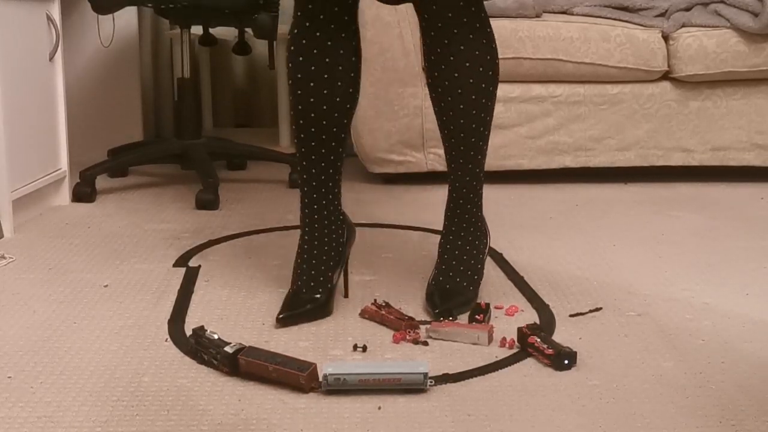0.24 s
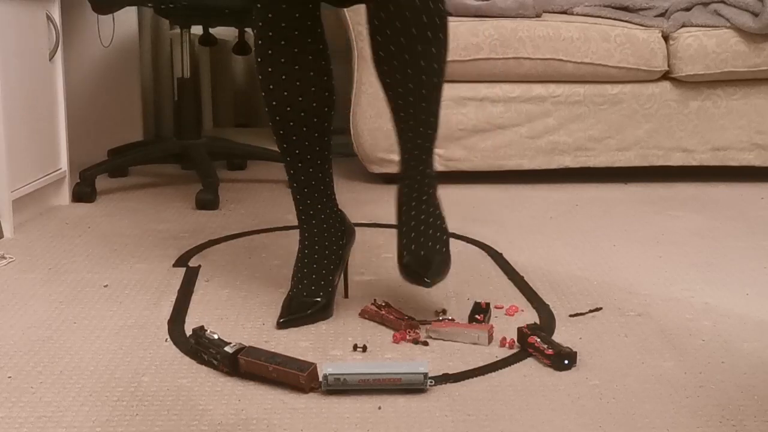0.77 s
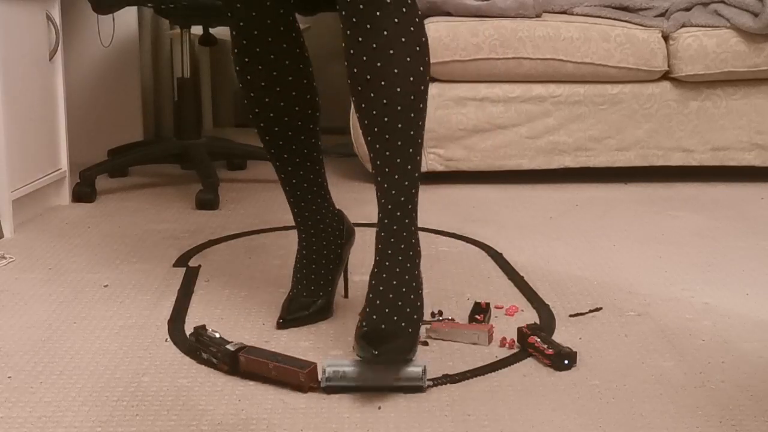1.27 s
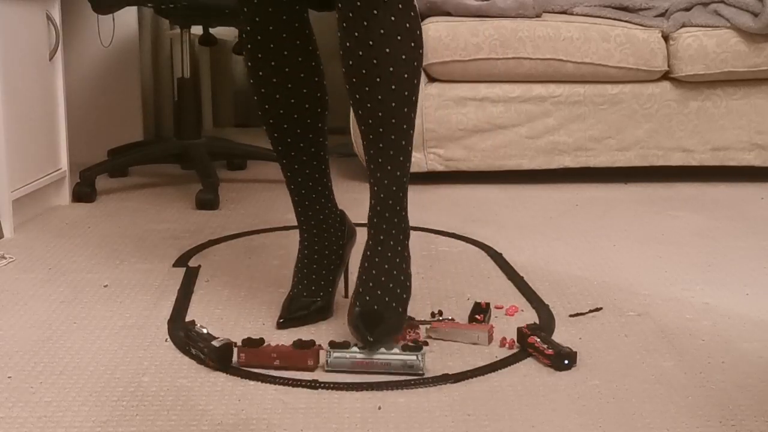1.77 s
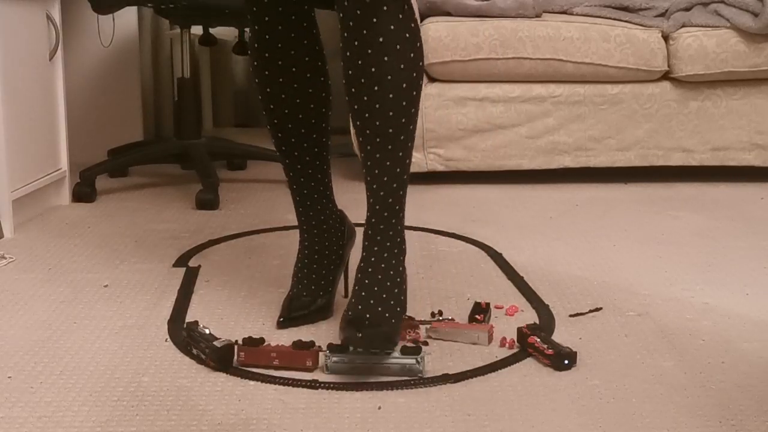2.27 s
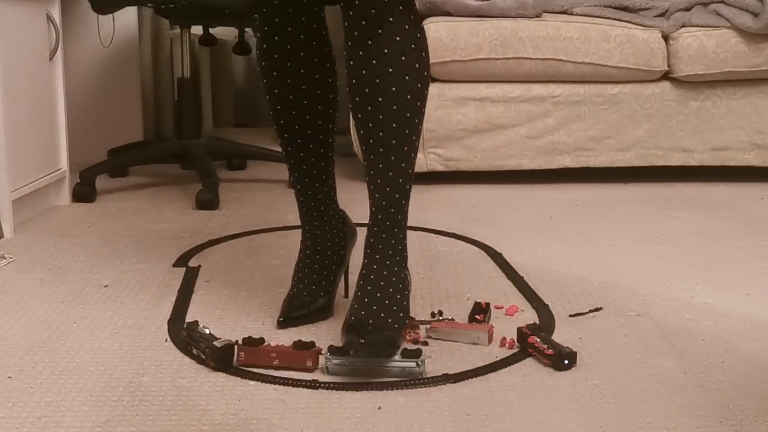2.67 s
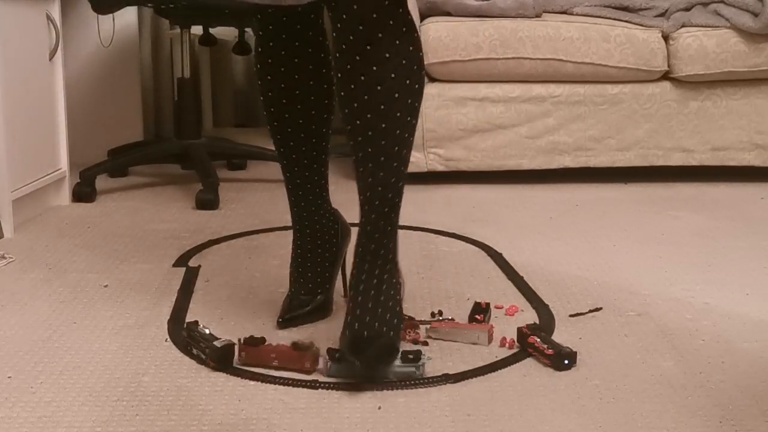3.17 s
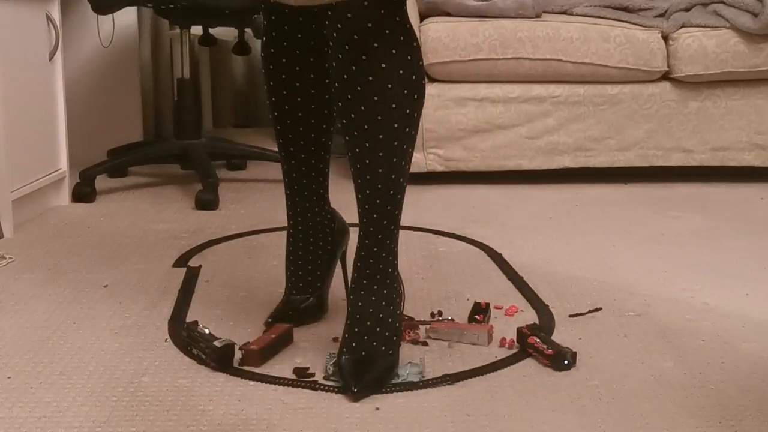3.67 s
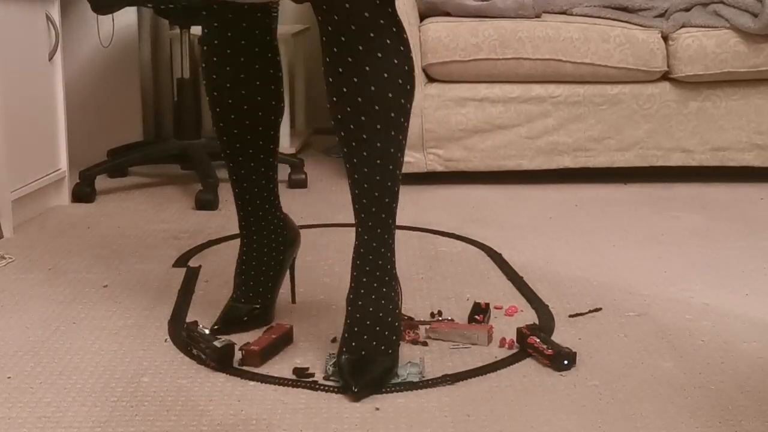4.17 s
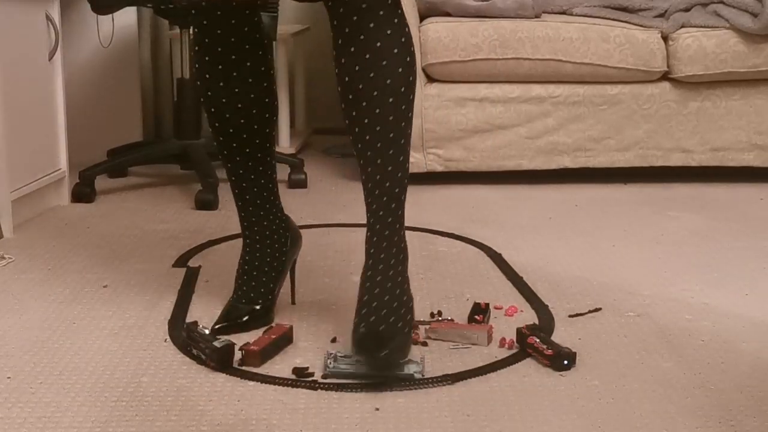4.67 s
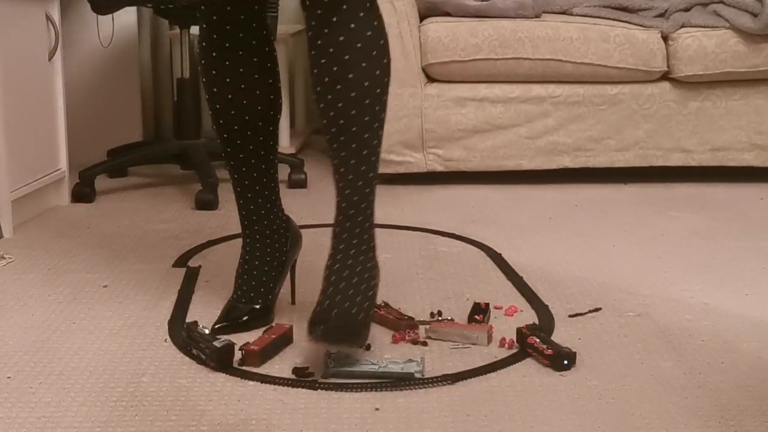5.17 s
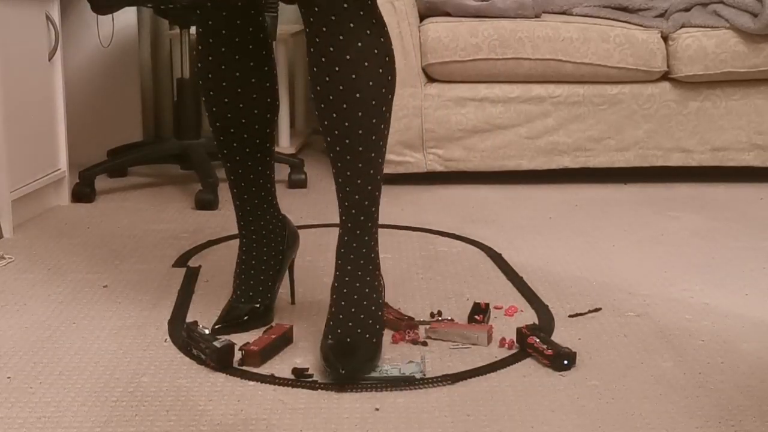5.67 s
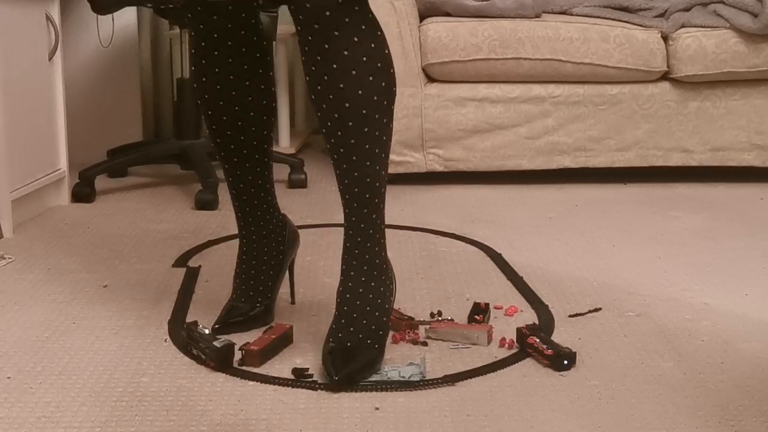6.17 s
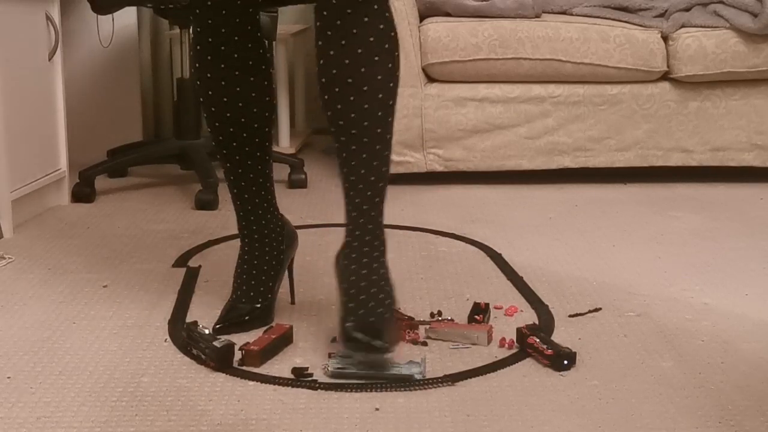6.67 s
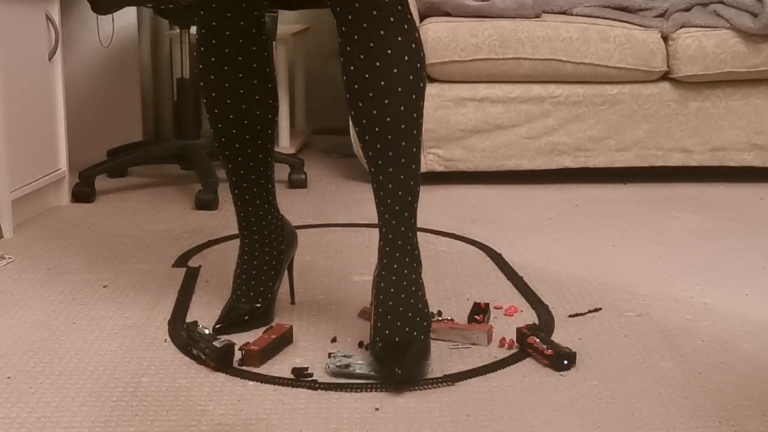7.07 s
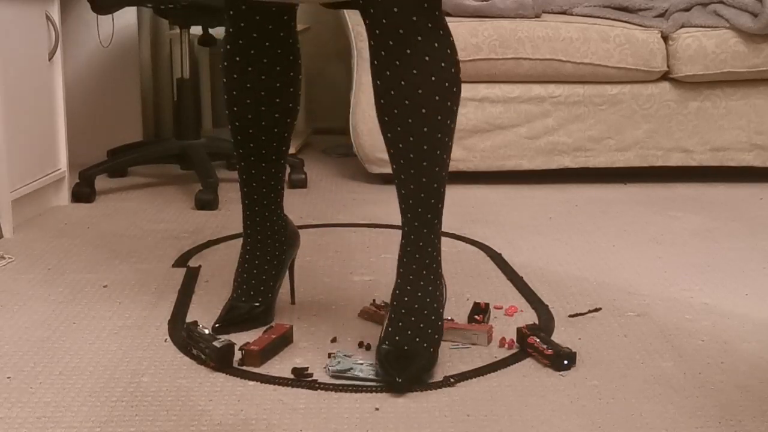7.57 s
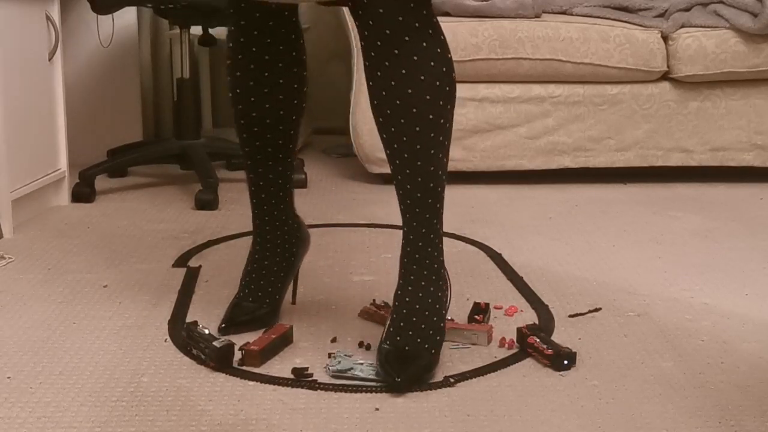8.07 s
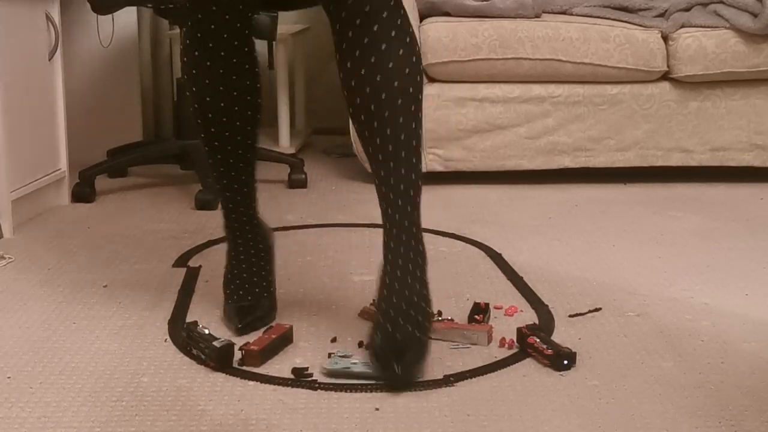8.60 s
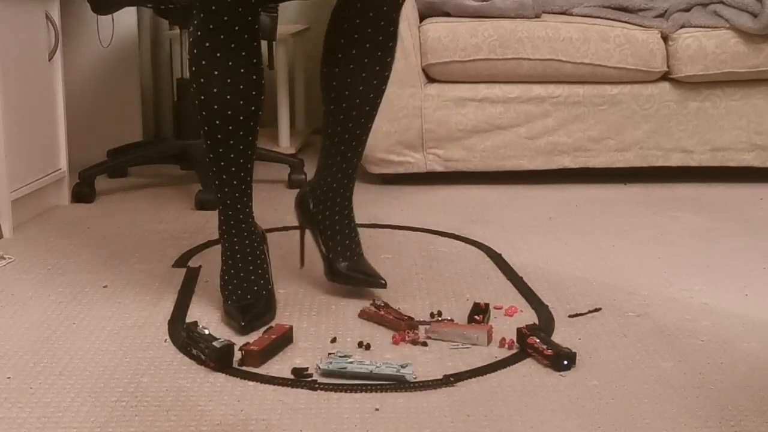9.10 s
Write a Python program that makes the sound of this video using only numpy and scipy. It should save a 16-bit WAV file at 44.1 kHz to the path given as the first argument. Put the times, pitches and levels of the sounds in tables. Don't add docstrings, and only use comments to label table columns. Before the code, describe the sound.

Stiff heel clicks and small ticks lead into sharp hollow plastic crunches, with heavy thumping steps and scattering fragments in a quiet furnished room.

```python
import sys
import numpy as np
from scipy import signal
from scipy.fft import rfft, irfft, next_fast_len
from scipy.io import wavfile
from scipy.ndimage import uniform_filter1d, map_coordinates

SR = 44100
rng = np.random.default_rng(int(sys.argv[2]) if len(sys.argv) > 2 else 0)


def rack_gain(trim_db):
    fader = np.asarray(trim_db, float)
    return 10 ** (fader / 20)


def put_to_file(sound):
    columns = np.atleast_2d(sound).T
    safe = np.clip(columns, -1, 1)
    whole_steps = np.round(safe * 32767)
    wavfile.write(sys.argv[1], SR, whole_steps.astype(np.int16))


N = 411894

# (time [s], level [dB])
RUMBLE_LEVEL = [(0.0, -46.5), (0.23, -53), (0.96, -53), (1.45, -51.5), (2.42, -47.5), (2.55, -50),
                (4.0, -48.5), (4.16, -56.5), (4.4, -52), (5.4, -50.5), (6.5, -55), (7.1, -49), (7.8, -52.5),
                (8.5, -50.5), (8.9, -57.5), (9.08, -66.5), (9.34, -54.5)]
# (frequency [Hz], width [Hz], level [dB])
ROOM_MODES = [(122, 27, -20), (138.7, 16, -3), (180, 34, -5.5), (267, 140, -9), (344.1, 42, -4.5),
              (403.4, 56, -5.5), (424, 170, -12.5), (765, 24, -27)]
# (time [s], quarter length [s], level [dB])
UPPER_SURGES = [(0.05, 0.027, 5.5), (0.157, 0.024, 5.5), (1.16, .06, 3), (2.105, .05, 3.5),
                (4.316, 0.014, 4.5), (4.36, 0.028, 4.5), (4.55, 0.031, 7.5), (4.973, 0.015, 4.5),
                (5.064, 0.017, 6), (7.97, 0.041, 1.5), (8.57, 0.027, 3.5)]
# (time [s], quarter length [s], level [dB])
DEEP_SURGES = [
    (0.95, 0.053, 5),
    (2.27, 0.055, 2.5),
    (3.8, .05, 3),
    (4.35, 0.065, 8),
    (4.595, 0.058, 5),
    (5.302, 0.08, 2),
    (8.551, .04, 5.5),
]
# (peak time [s], level [dB])
SHAKES = [
    (1.6, -61),
    (3.35, -44),
    (3.75, -51.5),
    (4.7, -68),
    (5.96, -52.5),
    (7.26, -54),
    (8.45, -56.5),
]
# (frequency [Hz], density [dB per Hz])
HISS = [(350, -43.5), (600, -16.5), (837, -5.5), (1150, -15.5), (1400, -12), (1560, -16), (4800, -19),
        (7590, -25), (14800, -23), (16500, -35.5)]
# (time [s], energy [dB])
STOMPS = [
    (1.509, -31),
    (3.258, -7.5),
    (5.459, -29),
    (5.887, -13.5),
    (7.16, -25),
]
# (frequency [Hz], width [Hz], level [dB])
BOARDS = [(59.7, 11, -16), (104.6, 2.8, -9), (137, 21, -1.5), (243, 42, -10.5)]
# (time [s], frequency [Hz], level [dB])
SQUEAK = [
    (1.77, 1715, -70),
    (1.9, 1730, -66),
    (1.97, 1745, -59),
    (2.01, 1730, -66),
    (2.05, 1720, -74),
]
# (peak time [s], swell [s], release [s], level [dB], brightness [dB])
GRIND = [(1.556, 0.085, 0.065, -27, 0), (1.38, .145, 0.1, -50, -19), (1.78, 0.042, 0.12, -45, -15.5),
         (2.03, 0.083, 0.038, -47.5, -10), (2.37, 0.015, 0.083, -37, -3.5), (3.27, 0.011, 0.16, -33, -1.5),
         (4.75, 0.21, 0.096, -46.5, -12), (5.44, 0.13, 0.032, -49.5, -5), (6.558, .03, 0.27, -50.5, -2),
         (7.142, 0.172, 0.051, -45, 1), (8.35, 0.083, 0.13, -48.5, -14.5), (8.5, .1, 0.092, -53, -15),
         (8.748, 0.082, 0.189, -49, -10.5)]
# (time [s], frequency [Hz], width [Hz], energy [dB])
RINGS = [(0.594, 800, 150, -19.5), (1.2056, 5300, 1490, -52), (1.2044, 9000, 1523, -48),
         (1.2257, 4860, 910, -52), (1.235, 2090, 300, -41.5), (1.5125, 1100, 400, -15),
         (1.3361, 2290, 500, -37), (1.403, 2600, 700, -28), (1.5117, 2740, 2500, -18),
         (1.558, 2300, 900, -15), (1.567, 3200, 700, -15.5), (1.761, 2130, 700, -30),
         (1.811, 11500, 250, -26), (1.958, 10900, 200, -34), (2.042, 11400, 250, -35),
         (2.332, 5800, 700, -32), (2.33, 10700, 600, -31), (2.375, 11600, 300, -19),
         (2.39, 11200, 250, -24), (2.93, 2070, 400, -21), (3.305, 3100, 700, -15), (3.647, 11400, 250, -22),
         (3.67, 575, 90, -18), (3.712, 12000, 6000, -24), (3.779, 3300, 109, -28), (3.897, 2500, 2000, -37),
         (3.981, 3500, 3000, -48), (4.053, 11400, 300, -31), (4.071, 11400, 250, -32),
         (5.8885, 760, 150, -7), (5.89023, 2250, 500, -14), (6.034, 3130, 250, -31),
         (6.552, 2800, 890, -40), (6.7, 3320, 600, -41), (6.797, 2330, 490, -36.5),
         (7.083, 4340, 2500, -30), (7.089, 4810, 4000, -30), (7.106, 6950, 300, -30),
         (7.159, 3000, 4000, -11.5), (7.1589, 800, 250, -10), (8.334, 2200, 1200, -31),
         (8.355, 4800, 600, -45), (8.399, 13000, 4140, -33), (8.438, 4000, 3000, -40),
         (8.642, 11000, 900, -46), (8.69, 9100, 900, -15.5), (8.699, 7000, 1490, -21),
         (8.755, 11900, 350, -25), (8.814, 5000, 4000, -30),
         (0.08, 8950, 1200, -38.5), (0.08, 2500, 900, -41), (0.172, 11400, 900, -31),
          (0.172, 6500, 700, -36.5), (1.515, 11500, 300, -21), (1.564, 11500, 250, -21.5),
          (1.6, 11200, 250, -23), (4.168, 2860, 150, -39), (4.26, 9100, 300, -33),
          (4.375, 2180, 300, -35.5), (4.553, 4990, 5000, -56), (4.7755, 10500, 400, -24),
          (4.7755, 3600, 2500, -24), (4.815, 6900, 300, -25), (5.1, 5260, 897, -48),
          (5.461, 12480, 2490, -16), (5.471, 2400, 1500, -14), (5.49, 6800, 500, -9.5),
          (5.68, 3290, 900, -25.5), (6.0343, 13130, 4000, -23), (6.1152, 6500, 1200, -8),
          (6.132, 6730, 700, -20), (6.2187, 4900, 1500, -10), (6.2305, 4430, 2500, -16.5),
          (7.2555, 4700, 900, -5), (7.363, 6600, 900, -27), (7.498, 4500, 900, -13),
          (7.654, 10540, 1500, -27), (8.686, 3480, 2490, -23), (8.9, 2970, 900, -20),
          (0.7287, 4850, 1200, -21), (1.53, 3500, 2000, -22), (1.544, 5000, 2000, -20),
          (1.58, 1500, 900, -20), (2.991, 4000, 4000, -16.5), (3.131, 3000, 3000, -19.5),
          (3.2585, 900, 800, -9), (3.2657, 1500, 1500, -9), (3.2761, 1600, 600, -11.5),
          (3.2755, 5200, 1200, -14.5), (3.288, 1300, 500, -14.5), (3.315, 1700, 494, -16.5),
          (6.128, 5500, 3000, -15), (7.172, 1750, 500, -15.5), (7.2557, 9000, 6050, -12.5),
          (8.255, 9500, 4000, -22), (8.46, 2000, 498, -40), (8.49, 2500, 300, -38),
          (8.706, 6670, 500, -13.5),
         (3.779, 2950, 200, -36), (3.2, 1480, 52, -40), (3.514, 3500, 320, -17),
            (3.1145, 2830, 1000, -16.5), (3.1125, 7100, 400, -16), (4, 1870, 200, -41),
            (4.791, 7200, 700, -23), (5.4, 9500, 2500, -24.5), (2.52, 1830, 40, -41),
            (7.436, 2400, 90, -21.5), (7.168, 2970, 300, -15), (8.475, 2100, 900, -36),
            (1.4725, 780, 220, -25)]
# (time [s], energy [dB], ring [Hz], splinters re
# energy [dB])
TICKS = [(0.078, -41, 5200, -3), (0.0924, -37.5, 5250, -2), (0.506, -42, 4780, -8),
         (0.5403, -41.5, 4660, -8), (1.235, -57, 2900, 7), (1.3101, -54, 5300, 19), (1.337, -37, 5560, -15),
         (1.391, -43, 4800, -9), (1.4005, -29, 5530, 0.5), (1.423, -30, 3100, -3), (1.761, -31, 3660, 6.5),
         (1.8116, -51, 5400, 13), (1.934, -43.5, 5230, 7.5), (1.958, -39, 4950, 9), (2.032, -39, 6770, 7),
         (2.386, -40, 6100, 6), (2.5677, -44, 4800, 0), (2.6564, -39, 5070, 0.5), (2.6787, -39.5, 3320, -2),
         (2.6966, -39, 2930, -10.5), (2.786, -45, 4700, -9),
         (3.7816, -28, 3330, -28), (3.898, -35.5, 6360, 8), (3.978, -39.5, 4870, -5),
            (4.0425, -40, 6560, 11), (4.0504, -48.5, 7100, 23), (4.07, -42.5, 6660, 19),
            (4.164, -41, 2840, -26), (4.2567, -29.5, 4500, -1.5), (4.358, -35, 4370, -18.5),
            (4.3664, -40, 5100, -2), (4.3757, -37, 2400, -12), (4.591, -23.5, 3610, -3),
            (5.1, -50, 5100, -5), (5.3187, -30.5, 5400, 0), (5.3518, -25, 6760, -1), (5.425, -26, 5860, -5),
            (6.467, -33, 4200, -32), (6.5227, -39, 3500, -27), (6.537, -49, 3700, 9),
            (6.5521, -24, 6560, 2), (8.0633, -59.5, 4660, -4), (8.0958, -47, 4750, -17),
            (8.18, -47, 4770, -3), (8.5263, -45, 4340, 7), (8.7505, -25, 6100, 5), (8.8, -24.5, 5740, 4.5)]
# (time [s], energy [dB], ring [Hz], knock re energy [dB], splinters re energy [dB])
SHOE = [(0.3031, -34, 5400, -6, -4), (0.3776, -27, 4900, -2, -36), (0.5925, -25.5, 4630, 17.5, -60),
        (0.7301, -15, 4600, 5, -20), (2.1525, -23, 4880, -1.5, 3), (4.1643, -22, 4520, -40, -7),
        (4.9345, -28.5, 5430, -23, 1.5), (6.797, -21, 4680, -29, -38), (6.976, -23, 5170, -21, 7.5),
        (8.2549, -19, 4800, -10, -2), (8.6696, -22.5, 5260, -42.5, -21), (8.897, -17, 4480, 3.5, -54.5)]
# (time [s], energy [dB], hollow knock re
# energy [dB], thick wall re energy [dB], splinters re energy [dB])
SCUFFS = [(0.164, -32, -19, -14, 2.5), (2.324, -36.5, -7, -21, 11), (1.4715, -40, 18, 14, 9),
          (1.5029, -16, 2.5, -7, -5.5), (1.5114, -11.5, 3.5, -1, 5), (1.5636, -15.5, -2, -9.5, 5.5),
          (2.3672, -26.5, 4.5, -22, -15), (2.373, -26, 3.5, -3, 9.5), (4.7668, -19.5, -25, -12, 1.5),
          (7.0162, -21, -24.5, -24, -3.5), (7.1075, -19, -19.5, -7, 0), (7.1255, -14.5, -17, -27, 3.5),
          (7.1585, -10, 12, 5, 3), (5.458, -11.5, -12.5, -8, 7.5), (5.5812, -21, -2, -6.5, 9),
          (6.0345, -18, 4.5, -4, 9)]
# (time [s], energy [dB], knock [dB], wall [dB], splinters
# [dB]), last three re energy
CRACKS = [(2.8371, -11, -3, -4, 8.5), (2.9305, -9.5, 0.5, -1.5, 5), (2.9482, -31, 15, -6.5, 9),
          (2.962, -18.5, 6.5, -2.5, 1), (2.9771, -8, -9, -6.5, 0.5), (3.1102, -17, 6.5, 2, -2),
          (3.1133, -14, -10.5, 3.5, 16.5), (3.1415, -9.5, 3.5, -15, -0.5), (3.1817, -24, 7.5, 1.5, 2),
          (3.2588, -3.5, 4.5, 4.5, 9.5), (3.2655, -10.5, -11.5, 0, -5), (3.275, -12, -10, -4, -6),
          (3.2854, -10.5, -17.5, -9, -6.5), (3.296, -1, -16, 0.5, 3.5), (3.303, -5.5, -12, 2.5, -9),
          (3.4528, -21, 5.5, 0.5, 0.5), (3.469, -18, -10.5, -5.5, 3.5), (3.5129, -7, -29, -12, 6),
          (3.6395, -20.5, 1.5, -5, 13.5),
          (4.5801, -20.5, 5.5, 4, 4.5), (5.4517, -14, -32.5, -2.5, 7.5), (5.4672, -9, -21.5, -4, -1.5),
           (5.4854, -2, -14, -26, 3.5), (5.6784, -19.5, -20, -13, -3.5), (5.8891, -7.5, 9, 2, 10),
           (6.1137, -2.5, -14.5, -22.5, -6), (6.131, -19.5, -5.5, -21.5, 9), (6.2183, -9, -5, -20, -5),
           (7.255, -2, -8, -13.5, -2), (7.3597, -19, -8.5, -11.5, -15), (7.4263, -6.5, -5, -3.5, 4.5),
           (7.492, -7, -10.5, -44, -4), (7.495, -15.5, 2.5, 0, 1), (7.5595, -15.5, -21, -7, 6),
           (7.6527, -16, -2, -6, 0.5), (8.3355, -23, -9, -15, 1.5), (8.685, -9, -35, -34, -5.5)]
# (frequency [Hz], width [Hz], level [dB])
SHELL = [(376, 93, -13), (478.3, 100, -0.5), (553, 46, 2.5), (630, 170, -4), (787, 49, -10),
         (840, 300, -9.5), (1130, 110, -15.5)]
# (frequency [Hz], T60 [s])
ROOM_T60 = [(100, 0.63), (300, 0.83), (800, 0.39), (2000, 0.31), (5500, 0.41), (14000, 0.29)]
# (frequency [Hz], gain [dB])
ROOM_COLOUR = [(300, 2), (560, 0.5), (1050, -1.5), (1700, 2), (4000, -1), (8000, -3), (14000, -3)]
# (delay [s], left [dB], right [dB])
ECHOES = [(.0008, -9, -9), (.0026, -16, -15), (.0058, -19, -17), (.0121, -15, -13), (.0129, -20, -18),
          (.0137, -22, -21), (.019, -19, -18)]
# (time [s], left minus right [dB])
FOOT = [(0, -3.5), (2.699, -2.5), (2.85, -6.5), (3.55, -2), (3.75, 1), (5.399, 3), (5.5, 0.5), (8.2, -3),
        (8.25, 0.5), (8.85, 3.5), (8.899, 3.5), (9.34, 0)]
# (frequency [Hz], gain [dB])
MIC = [(300, 1), (1500, 2.5), (5000, 2.5), (6800, 2), (7800, -3), (8800, 3.5), (10000, -1.5), (11300, 1),
       (12600, -1), (14300, -2.5), (15500, 3), (16300, -25)]
# (frequency [Hz], left minus right [dB])
MIC_BALANCE = [(60, 2), (110, 2), (200, 1.5), (380, -0.5), (700, -5), (1290, -1.5), (2380, -3), (4400, -1),
               (8120, -2), (15000, -10)]

DEEP_MODE_MAX_HZ, UPPER_MODE_MAX_HZ = 300, 500
TEAR_S = 0.0004
OPPOSITE = np.array([[1], [-1]])


def along(table, hz):
    points_hz, values = np.transpose(table)
    return np.interp(np.log(np.maximum(hz, 1)), np.log(points_hz), values)


def unit(x):
    return x / np.sqrt(np.sum(x ** 2, axis=-1, keepdims=True))


def add_at(out, s, sound):
    start = int(s * SR)
    out[start:start + len(sound)] += sound


def bandpass(x, order, low_hz, high_hz):
    return signal.sosfilt(signal.butter(order, [low_hz, high_hz], "band", fs=SR, output="sos"), x)


def colour(x, db_of):
    size = 2048
    ceps = irfft(np.log(rack_gain(db_of(np.fft.rfftfreq(size, 1 / SR)))))
    ceps[1:size // 2] *= 2
    ceps[size // 2 + 1:] = 0
    response = irfft(np.exp(rfft(ceps)))
    return signal.fftconvolve(x, response[None], axes=1)[:, :x.shape[1]]


def noise_band(hz, width_hz, size=N, channels=1):
    fast = next_fast_len(size)
    f = np.fft.rfftfreq(fast, 1 / SR)
    spectrum = rfft(rng.standard_normal((channels, fast)))
    band = irfft(spectrum / (1 + ((f - hz) / width_hz * 2) ** 2), fast)
    return unit(band[:, :size]) * np.sqrt(size)


def stereo_band(hz, width_hz, diffuse_hz, size=N):
    mid, side = noise_band(hz, width_hz, size, channels=2)
    return mid + min(hz / diffuse_hz, 1) * side * OPPOSITE


def walk(rate_hz):
    k = int(SR / rate_hz)
    held = np.repeat(rng.standard_normal(N // k + 1), k)
    return 1.65 * uniform_filter1d(uniform_filter1d(held, k), k)[:N]


def rumble_level_db():
    duck_db, duck_s = -7.5, 0.2
    t = np.arange(N) / SR
    level_db = np.interp(t, *np.transpose(RUMBLE_LEVEL))
    for s, db in STOMPS:
        late = np.maximum(t - s, 0) / duck_s
        level_db = level_db + duck_db * rack_gain(0.67 * (db + 10.5)) * late * np.exp(1 - late)
    return level_db


def surge_db(table):
    t = np.arange(N) / SR
    return sum(db * np.maximum(1 - ((t - s) / quarter_s) ** 2 / 4, 0) for s, quarter_s, db in table)


def wall_rumble(level_db):
    upper_db, deep_db = surge_db(UPPER_SURGES), surge_db(DEEP_SURGES)
    rumble = 0
    for hz, width_hz, db in ROOM_MODES:
        mode_db = db + 2.75 * walk(12)
        if hz < DEEP_MODE_MAX_HZ:
            mode_db = mode_db + deep_db
        elif DEEP_MODE_MAX_HZ < hz < UPPER_MODE_MAX_HZ:
            mode_db = mode_db + upper_db
        rumble = rumble + rack_gain(mode_db) * stereo_band(hz, width_hz, 1500)
    return rack_gain(level_db - 5.0) * rumble


def floor_shake():
    rest_db, rise_db_s, fall_db_s = -75.5, 79.5, 48.5
    t = np.arange(N) / SR
    levels_db = [db - np.where(t < s, rise_db_s * (s - t), fall_db_s * (t - s)) for s, db in SHAKES]
    shake_db = np.maximum(np.max(levels_db, axis=0), rest_db)
    rocking = rack_gain([[2.5], [-2.5]]) * noise_band(18, 34)
    return rack_gain(shake_db) * (rocking + rack_gain(-12.5) * noise_band(65, 50, channels=2))


def mic_hiss(rumble_db):
    hiss = colour(rng.standard_normal((2, N)), lambda hz: along(HISS, hz) - along(MIC, hz))
    return rack_gain(-65 + 0.3 * (rumble_db + 46.5)) * unit(hiss) * np.sqrt(N)


def background():
    rumble_db = rumble_level_db()
    return wall_rumble(rumble_db) + floor_shake() + mic_hiss(rumble_db)


def stomps():
    t = np.arange(SR // 2) / SR
    modes = sum(rack_gain(db) * np.sin(2 * np.pi * hz * t) * np.exp(-np.pi * width_hz * t)
                for hz, width_hz, db in BOARDS)
    thud = unit(modes * (1 - np.exp(-t / 0.0058)))
    out = np.zeros(N)
    for s, db in STOMPS:
        add_at(out, s, rack_gain(db) * thud)
    return out


def squeak():
    s, hz, db = np.transpose(SQUEAK)
    t = np.arange(N) / SR
    pitch_hz = np.interp(t, s, hz) + 12 * walk(240)
    level_db = np.interp(t, s, db, left=-150, right=-150) + 4.5 * walk(60) - 7
    return rack_gain(level_db) * np.sin(2 * np.pi * np.cumsum(pitch_hz) / SR)


def grind():
    slips_per_s, edge_db = 1600, -17.5
    t = np.arange(N) / SR
    size_db = 3.2 * np.minimum(rng.exponential(size=N), 3.1)
    slips = (rng.random(N) < slips_per_s / SR) * rack_gain(size_db) * rng.choice([-1, 1], N)
    slips = slips / np.sqrt(np.mean(slips ** 2))
    panel = bandpass(slips, 1, 1100, 6000)
    splinter = bandpass(slips, 1, 10400, 12400)
    out = np.zeros(N)
    for s, swell_s, release_s, db, bright_db in GRIND:
        away = np.where(t < s, (s - t) / swell_s, (t - s) / release_s)
        level = (away < 1) * rack_gain(db + edge_db * np.minimum(away, 1) - 6.5)
        out += level * (panel + rack_gain(bright_db) * splinter)
    return out


def rings():
    t = np.arange(4096) / SR
    out = np.zeros(N)
    for s, hz, width_hz, db in RINGS:
        mode = np.sin(2 * np.pi * hz * t) * np.exp(-np.pi * width_hz * t)
        add_at(out, s, rack_gain(db) * unit(mode))
    return out


def fractures(s, knock_db, wall_db, panel_db, panel_hz, splinter_db,
              sharp, skirt_db, tear_s, glint_db, slip_s, order=1):
    size, count = 4096, len(s)
    knock_db, wall_db, panel_db, panel_hz, splinter_db = (
        c[:, None] for c in (knock_db, wall_db, panel_db, panel_hz, splinter_db))
    f = np.fft.rfftfreq(size, 1 / SR) + 1
    chance = rng.random((count, 16))

    def mode(hz, width_hz):
        return 1j * f * width_hz / (hz ** 2 - f ** 2 + 1j * f * width_hz)

    knock = 0
    for k, (hz, width_hz, db) in enumerate(SHELL):
        shifted_hz = hz * (.97 + 0.029 * chance[:, [k + 1]])
        knock = knock + rack_gain(db + 5.7 * chance[:, [k]]) * mode(shifted_hz, width_hz)
    wall = mode(1946, 3300) ** 2
    panel = mode(panel_hz, panel_hz / sharp) ** order + rack_gain(skirt_db) * mode(5300, 7800) ** 2
    splinter = -mode(12540, 5200) ** 2 - rack_gain(glint_db) * mode(11400, 900)
    parts = ((knock_db, knock), (wall_db, wall), (panel_db, panel), (splinter_db, splinter))
    spectrum = rfft(sum(rack_gain(db) * unit(irfft(part)) for db, part in parts))

    for k, place in enumerate(chance[:, 8:13].T):
        hz = 1300 * 2 ** (.5 * (k + place[:, None]))
        spectrum = spectrum * (1 + .45 * mode(hz, hz / 8)) / 1.05
    for jump in chance[:, -2:].T:
        jump_s = tear_s * (.15 + jump[:, None]) * rack_gain(.3 * knock_db + 5)
        late = np.exp(-2j * np.pi * f * jump_s)
        spectrum = spectrum * (late - .6) / (1 - 0.48 * late)
    if slip_s:
        burst = rng.standard_normal((count, size)) * np.exp(-np.arange(size) / SR / slip_s)
        spectrum = spectrum * rfft(unit(burst))
    out = np.zeros(N + size)
    for at_s, sound in zip(s, irfft(spectrum)):
        add_at(out, at_s, sound)
    return rack_gain(-0.5) * out[:N]


def ticks():
    s, db, hz, splinter_db = np.transpose(TICKS)
    wall_db = db - 3 - 0.3636 * (db + 40.5)
    return fractures(s, db - 13, wall_db, db, hz, db + splinter_db,
                     sharp=28.0, skirt_db=-10.5, tear_s=TEAR_S, glint_db=7.8, slip_s=0.0051)


def clicks():
    s, db, hz, knock_db, splinter_db = np.transpose(SHOE)
    wall_db = db - 8 + 0.277 * knock_db
    return fractures(s, db + knock_db, wall_db, db, hz, db + splinter_db,
                     sharp=3.8, skirt_db=-5.5, tear_s=TEAR_S / 2, glint_db=-1.5, slip_s=0, order=2)


def cracks(table, slip_s, glint_db):
    panel_hz, thick_db_per_octave = 4700, 61
    s, db, knock_db, wall_db, splinter_db = np.transpose(table)
    hz = panel_hz * 2 ** (-wall_db / thick_db_per_octave)
    return fractures(s, db + knock_db, db + wall_db, db, hz, db + splinter_db,
                     sharp=2.3, skirt_db=-2.5, tear_s=TEAR_S, glint_db=glint_db, slip_s=slip_s)


def room_tail(size):
    build_s, build_cycles, cut_s = 0.005, 6.9, 0.27
    t = np.arange(size) / SR
    tail = 0
    for hz in 120 * 2 ** np.arange(0, 7.2, .5):
        decay = np.exp(-np.log(1000) * t / along(ROOM_T60, hz))
        build = 1 - np.exp(-t / max(build_s, build_cycles / hz))
        tail = tail + np.sqrt(hz) * stereo_band(hz, hz / 2, 2000, size) * decay * build
    tail = tail * np.exp(-(t / cut_s) ** 4)
    return colour(unit(tail), lambda hz: along(ROOM_COLOUR, hz))


def early_echoes(size):
    scatter_db, scatter_s = -3, 0.001
    echoes = np.zeros((2, size))
    for delay_s, left_db, right_db in ECHOES:
        echoes[:, int(delay_s * SR)] = rack_gain([left_db, right_db])
    echoes = signal.sosfilt(signal.butter(2, 850, "high", fs=SR, output="sos"), echoes)
    burst = rng.standard_normal(size) * np.exp(-np.arange(size) / SR / scatter_s)
    scatter = unit(signal.lfilter([1, -1], [1, -.85], burst))
    return echoes + rack_gain(scatter_db) * scatter * OPPOSITE


def room(toy, shoe):
    drift_s = 0.00012
    size = SR // 2
    tail = room_tail(size)
    wet = signal.fftconvolve(toy[None], tail + early_echoes(size), axes=1)
    wet = wet + signal.fftconvolve(rack_gain(-3) * shoe[None], tail, axes=1)
    drifted = []
    for side in wet[:, :N]:
        position = np.arange(N) + drift_s * SR * walk(9)
        drifted.append(map_coordinates(side, [position], order=2, mode="nearest"))
    return np.array(drifted)


def scene():
    toy = squeak() + grind() + rings() + ticks()
    toy = toy + cracks(SCUFFS, slip_s=0.0062, glint_db=-3.5)
    toy = toy + cracks(CRACKS, slip_s=0, glint_db=-11.0)

    click = clicks()
    rough = unit(rng.standard_normal(440))
    slip = rack_gain(-5.0) * np.roll(signal.oaconvolve(click, rough)[:N], -int(.0095 * SR))
    shoe = click + rack_gain(-11) * np.roll(click, int(.0175 * SR)) + rack_gain(-12) * np.roll(click, int(.035 * SR))
    beam = bandpass(shoe, 2, 4500, 5230)
    spill = rack_gain(-2.0) * shoe + slip
    direct = rack_gain(-3.0) * toy + rack_gain(-2) * beam + rack_gain(-8.5) * spill

    left_lag = -1
    near = np.array([np.roll(direct, left_lag), direct]) + room(toy, shoe + slip)
    pan_db = np.interp(np.arange(N) / SR, *np.transpose(FOOT))
    return rack_gain([pan_db / 2, -pan_db / 2]) * near + stomps() + background()


def low_pass(x):
    return signal.sosfilt(signal.butter(12, 16000, fs=SR, output="sos"), x)


def record(dry):
    half_db = along(MIC_BALANCE, np.fft.rfftfreq(N, 1 / SR)) / 2
    heard = colour(dry, lambda hz: along(MIC, hz))
    both = irfft(rfft(heard) * rack_gain([half_db, -half_db]), N)
    rounded = np.tanh(1.5 * both) / 1.5
    return low_pass(rounded)


dry = scene()
out = record(dry)
put_to_file(out)
```